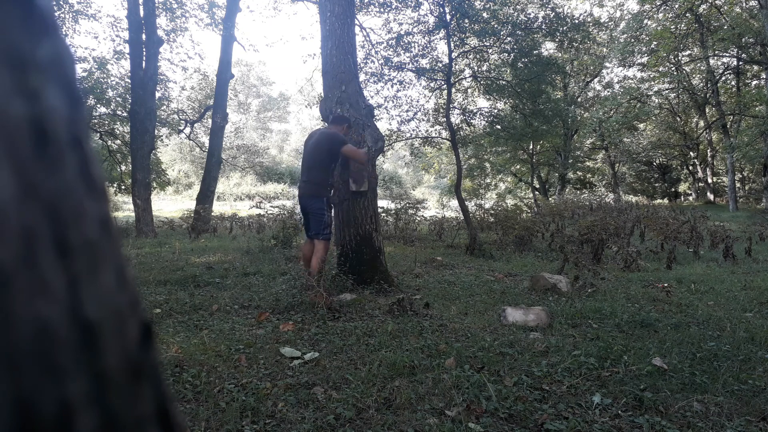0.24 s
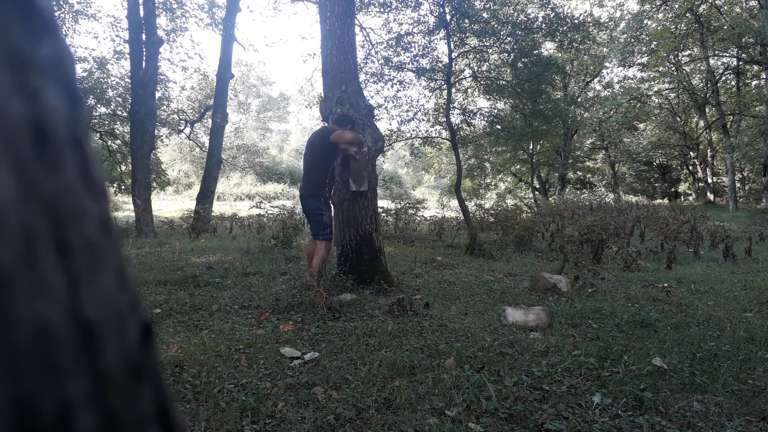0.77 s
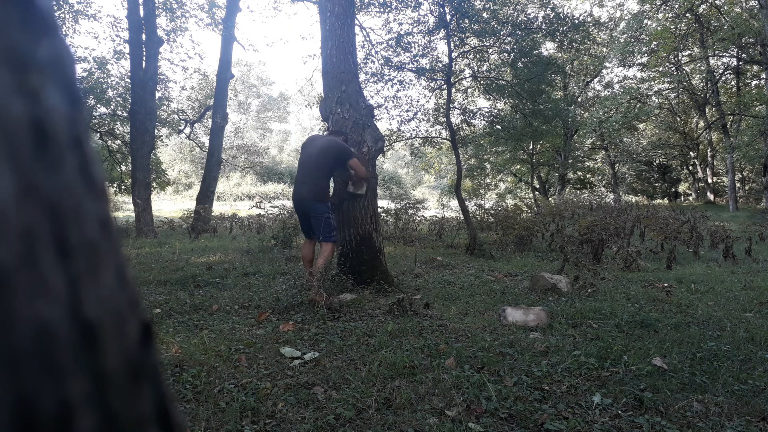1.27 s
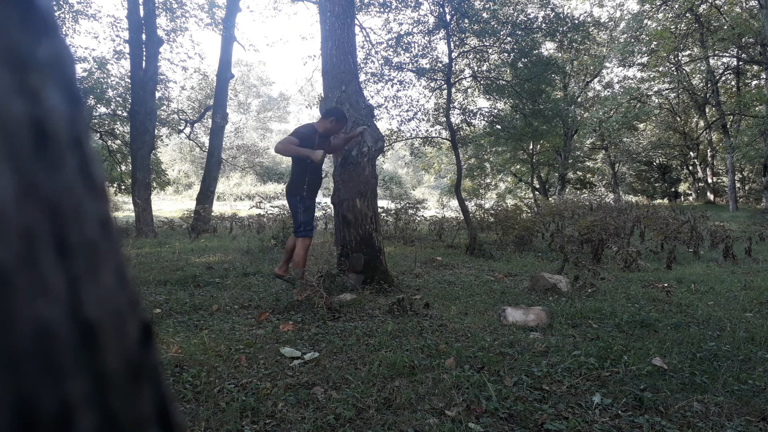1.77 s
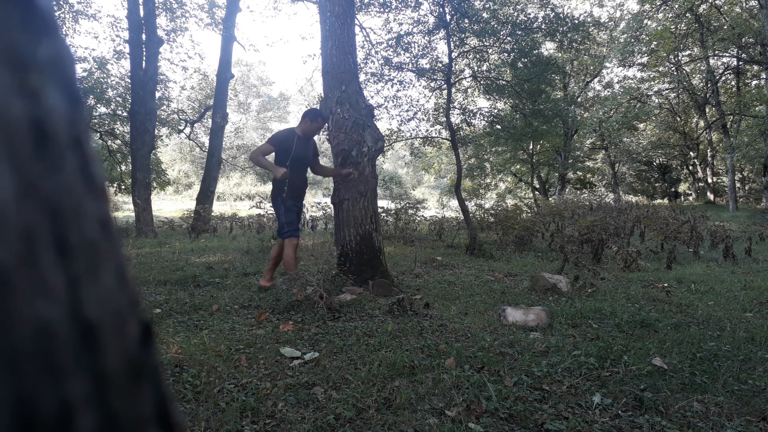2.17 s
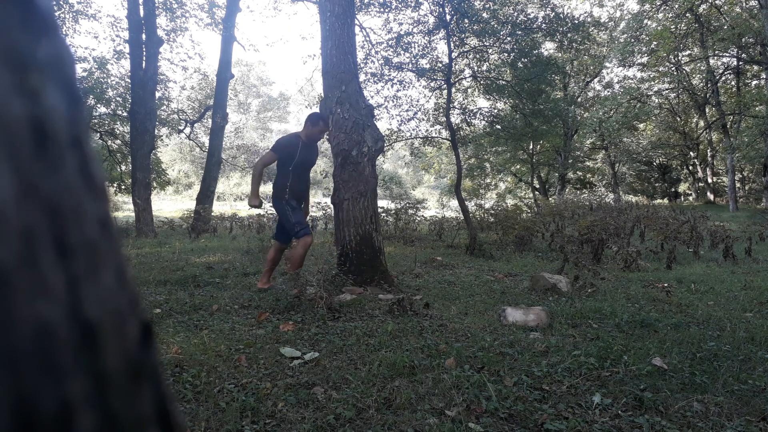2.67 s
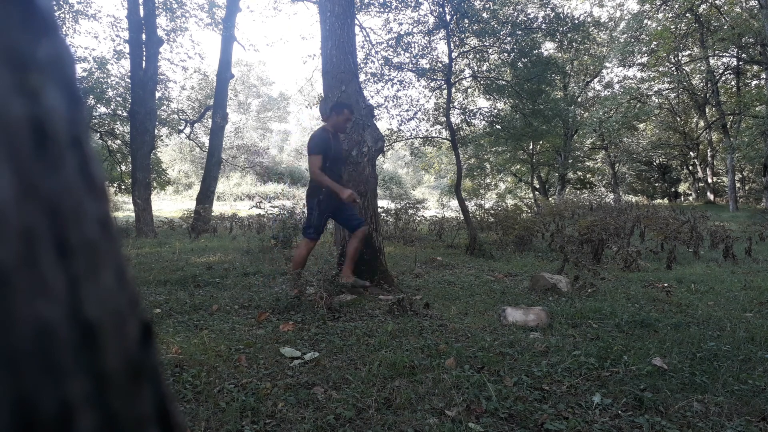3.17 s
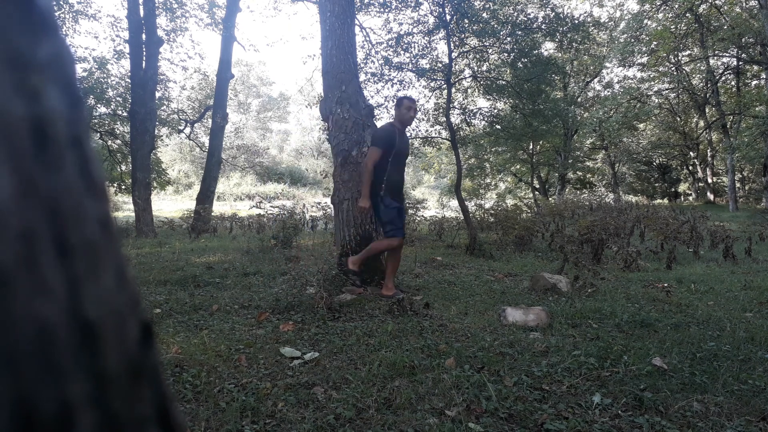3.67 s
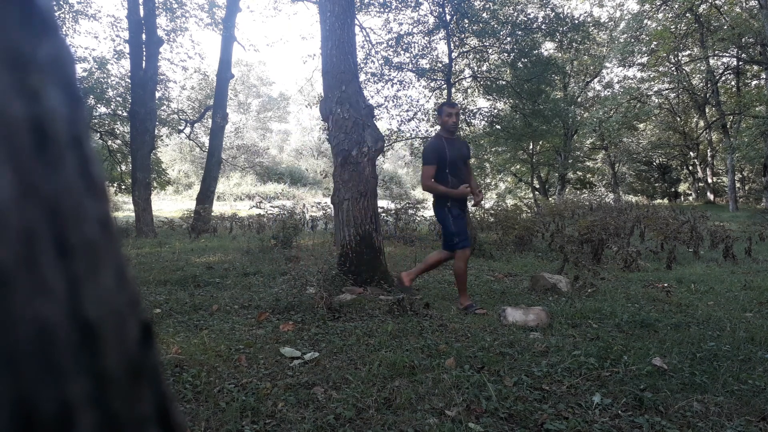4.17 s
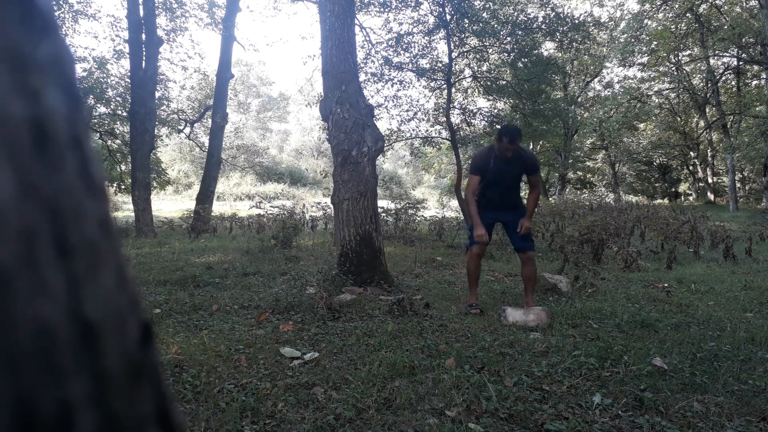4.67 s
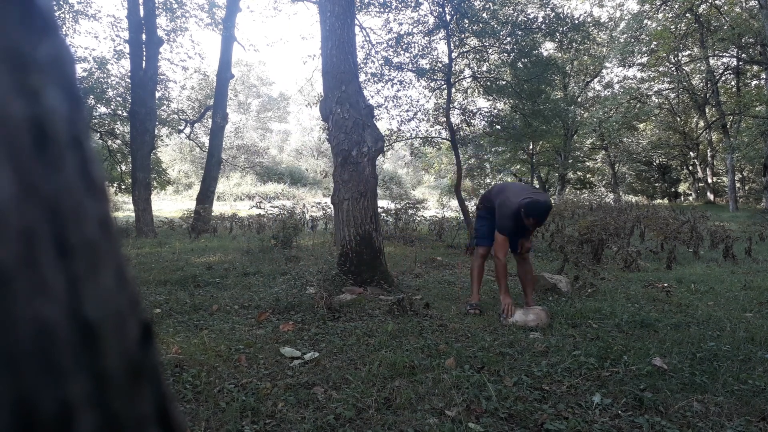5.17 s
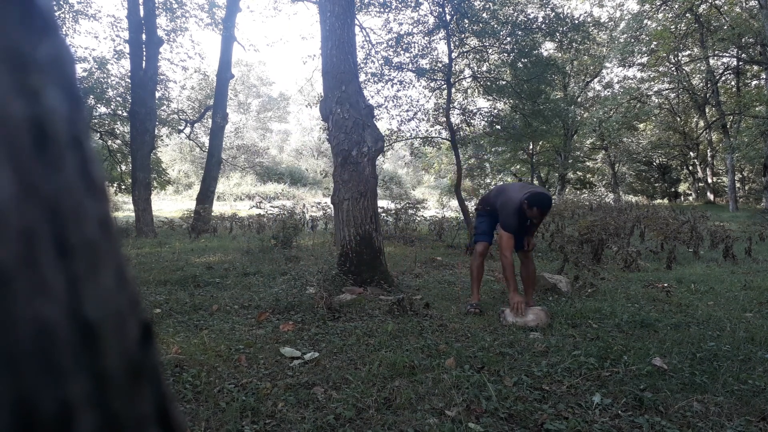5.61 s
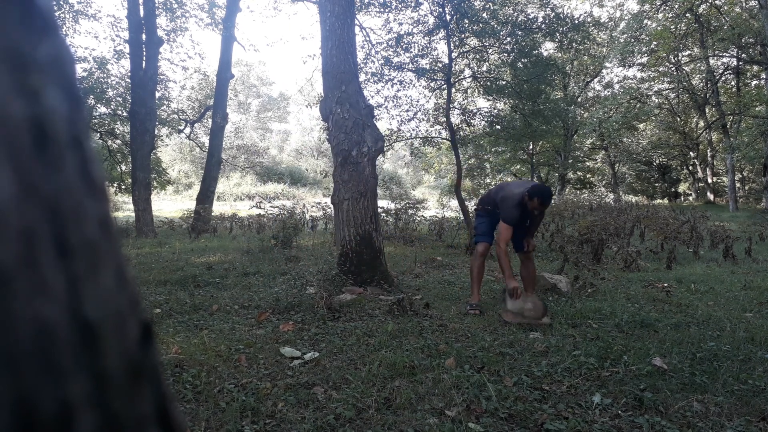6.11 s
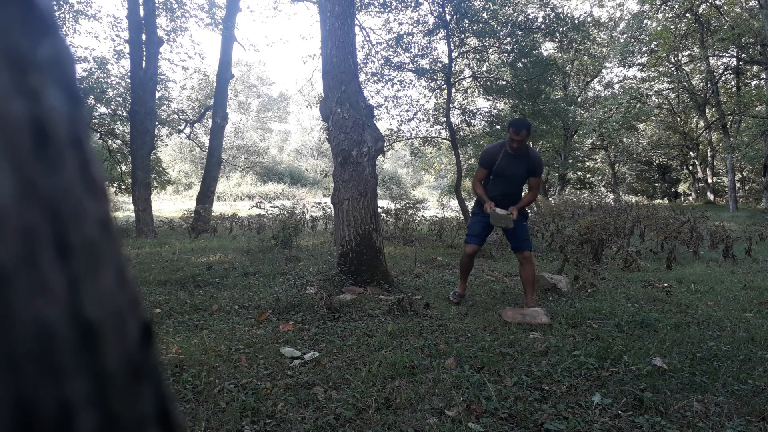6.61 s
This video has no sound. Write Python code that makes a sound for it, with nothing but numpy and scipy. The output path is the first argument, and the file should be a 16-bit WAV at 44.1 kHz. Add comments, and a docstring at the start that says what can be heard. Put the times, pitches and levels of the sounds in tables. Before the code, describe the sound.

In a quiet forest, one blow breaks a wooden board held against a trunk with a loud, sharp crack. The board splinters and its pieces clatter down, ringing briefly. Feet then rustle through dry leaves and snap twigs, wood is knocked lightly, and a crisp twig snap comes near the end. A single microphone beside a trunk picks up short echoes and a faint, steady hush.

```python
"""A forest, one microphone close to a trunk, a steady hush far off. At 1.3 s one blow breaks a wooden board
held against the trunk: its fibres crack in a quick burst that clips the recorder and ducks its gain.
The board splinters, and the pieces clatter down and ring until about 3 s. Then feet rustle the leaf litter
and snap twigs, and wood is knocked lightly; the loudest twig goes just before the end.
All along, the trunks around scatter the sounds of wood into a short tail."""
import sys
import numpy as np
from scipy import signal
from scipy.fft import rfft, irfft, next_fast_len
from scipy.io import wavfile
from scipy.ndimage import uniform_filter1d, map_coordinates

SR = 44100
rng = np.random.default_rng(int(sys.argv[2]) if len(sys.argv) > 2 else 0)


def store_pcm(level_fs):
    """Save levels as 16-bit WAV."""
    pcm = np.round(np.clip(level_fs, -1, 1) * 32767).astype(np.int16)
    wavfile.write(sys.argv[1], SR, np.atleast_2d(pcm).T)


N = 302085

# The board's fibres breaking and its pieces colliding; the first row is the blow:
# start_s, level_db, pitch_hz, body_db, body_hz, treble_db, hold_s, ring_db
CRACKS = [(1.2869, -10.5, 2600, -5.5, 950, -15, 0.0028, -18), (1.2889, 5, 2670, -5.5, 940, -6, 0.0028, -40),
          (1.2979, -1.5, 1455, -11, 930, -18.5, 0.0093, -8.5),
          (1.3069, 0.5, 1540, -13, 890, -25, .003, -44), (1.315, -17.5, 1560, -20, 387, -29, 0.0044, -20),
          (1.3286, -20.5, 1610, -24.5, 405, -34, 0.0028, -24),
          (1.35, -31.5, 1600, -26, 998, -38.5, 0.0035, -18), (1.6083, -34, 1300, -43, 930, -34, .001, -14),
          (1.6217, -29, 2870, -57, 990, -34, 0.00063, -26),
          (1.688, -27, 4100, -55.5, 432, -31.5, 0.00082, -11),
          (1.703, -41, 3200, -45, 296, -28, 0.0036, -3), (1.7237, -37.5, 3560, -57, 990, -31.5, .002, 0),
          (1.7332, -33, 1270, -53, 302, -37, 0.0023, -1), (1.7815, -47, 1410, -58, 670, -41, 0.00085, -16),
          (1.802, -43.5, 3150, -53, 300, -30.5, 0.011, 6),
          (1.831, -23.5, 1120, -27.5, 780, -46.5, 0.0013, -12.5),
          (1.837, -34, 3060, -57, 622, -29, 0.0016, 0.5), (1.876, -37, 4520, -49, 540, -28.5, 0.0035, -10),
          (1.9018, -22, 1150, -35.5, 570, -35, 0.00086, -20),
          (1.918, -25, 2840, -62, 900, -26.5, 0.006, -18),
          (1.9712, -21.5, 3980, -53, 364, -22.5, 0.00048, -20),
          (1.9866, -30, 3170, -34.5, 700, -36, 0.023, 0), (2.034, -51, 4320, -62, 300, -32.5, .001, -16),
          (2.0549, -13.5, 2390, -20, 583, -12, 0.0066, -13.5),
          (2.0634, -12.5, 3900, -16.5, 610, -19.5, 0.0092, -15),
          (2.0994, -20, 1650, -34, 300, -32, 0.0027, -4.5), (2.115, -32, 1630, -58, 880, -48, 0.0034, -9),
          (2.1182, -18.5, 1376, -25.5, 815, -35, 0.0045, -7.5),
          (2.129, -11.5, 1448, -28.5, 830, -33.5, 0.0098, -12),
          (2.1389, -11, 1370, -16, 1100, -48, 0.0068, -8), (2.175, -39, 1370, -41, 433, -38, 0.0018, -14),
          (2.219, -30, 1580, -54, 930, -31.5, .008, -4), (2.247, -36, 1500, -60, 754, -41, 0.0026, -2),
          (2.262, -42.5, 1440, -45, 288, -51, .002, 5), (2.344, -35, 3470, -58, 300, -39, 0.0067, -8),
          (2.3976, -33.5, 4200, -47, 790, -32.5, 0.005, -12),
          (2.5006, -31, 4120, -37.5, 795, -36, 0.0011, -6.5), (2.5453, -51, 1520, -50, 1000, -41, .001, 0),
          (2.712, -47, 1160, -51, 920, -41, .001, -10), (2.7418, -23, 4540, -31.5, 580, -36, 0.0042, -17),
          (2.7474, -22, 1120, -36.5, 584, -48, 0.0043, -12),
          (2.876, -39.5, 1900, -51, 845, -58, 0.0038, -14), (2.82, -37.5, 1980, -47, 1000, -46, 0.0096, -8)]


def amp(db):
    return 10 ** (np.asarray(db) / 20)


def unit_rms(x):
    return x / np.sqrt(np.mean(x ** 2) + 1e-20)


def unit_peak(x):
    return x / np.max(np.abs(x))


def along(points, hz):
    """Interpolate (hz, value) points on a log frequency axis."""
    point_hz, values = np.transpose(points)
    return np.interp(np.log(hz + 1), np.log(point_hz + 1), values)


def curves(rows):
    """One value per sample for each column after the time."""
    time_s, *columns = np.transpose(rows)
    return [np.interp(np.arange(N) / SR, time_s, column) for column in columns]


def wobble(rate_hz):
    """A smooth random curve with rate_hz knots a second."""
    knots = rng.standard_normal(int(N * rate_hz / SR) + 4)
    return map_coordinates(knots, [np.arange(N) * rate_hz / SR])


def filtered(x, response):
    """Filter x by a complex function of frequency."""
    size = next_fast_len(2 * len(x))
    return irfft(rfft(x, size) * response(np.fft.rfftfreq(size, 1 / SR)), size)[:len(x)]


def resonance(f, hz, width_hz):
    """The causal response at f of one resonance centred on hz."""
    return 1j * f * width_hz / (hz * hz - f * f + 1j * f * width_hz)


def add(track, start_s, sound):
    part = track[round(start_s * SR):][:len(sound)]
    part += sound[:len(part)]


def fibre_burst(level_db, pitch_hz, body_db, body_hz, treble_db, hold_s, t60_s, q):
    """Fibres break in uneven clumps that hold, then die: a mid resonance, a low body and treble."""
    clump_db, clump_s, sag_db_per_s, treble_t60_s = 5, 0.0012, 305, 0.041
    t = np.arange(SR // 8) / SR
    dying_s = np.maximum(t - hold_s, 0)
    envelope = amp(-60 * dying_s / t60_s) * (1 - np.exp(-t / 0.00023))
    burst = envelope * rng.standard_normal(len(t))
    clumps = np.interp(t, np.arange(120) * clump_s, rng.standard_normal(120))
    burst *= amp(clump_db * clumps - sag_db_per_s * np.minimum(t, hold_s))
    burst[8] += 4  # the first break is the sharpest
    mid = filtered(burst, lambda f: (resonance(f, pitch_hz, pitch_hz / q) + 0.24)
                   * resonance(f, 2700, 4500) ** 3)
    body = filtered(burst, lambda f: resonance(f, body_hz, 0.7 * body_hz) ** 2)
    brief = burst * amp(-60 * dying_s / treble_t60_s)  # the treble is over first
    treble = filtered(brief, lambda f: resonance(f, 7300, 7000) ** 3 / (1 + 1j * f / 9000) ** 2)
    return (amp(level_db - 3) * unit_peak(mid) + amp(body_db) * unit_peak(body)
            + amp(treble_db + 0.5) * unit_peak(treble))


def breaking_board():
    """Each crack is a burst that also rings the board's modes at new strengths."""
    # Modes of the board: pitch_hz, level_db, t60_s
    modes = [(888, -17.5, 0.043), (1297, -1.5, .055), (1443, 2.5, 0.043), (1549, -1.5, .06),
             (2120, -5.5, 0.12), (2950, -8.5, 0.067), (3110, -5.5, 0.055), (3390, -8, 0.083),
             (4330, -5, 0.052), (4423, -16, .05)]
    out, t = np.zeros(N), np.arange(SR // 4) / SR
    for start_s, level_db, pitch_hz, *body_and_treble, hold_s, ring_db in CRACKS:
        add(out, start_s, fibre_burst(level_db, pitch_hz, *body_and_treble, hold_s, t60_s=0.014, q=6.2))
        attack = 1 - np.exp(-t / (0.0005 + hold_s / 2))
        for mode_hz, mode_db, t60_s in modes:
            near_db = -10 * abs(np.log2(mode_hz / pitch_hz))  # modes near the crack's pitch ring most
            size_db, detune = rng.normal(0, [4, 0.015])
            decay = amp(mode_db + near_db + size_db - 60 * t / t60_s)
            ring = decay * np.sin(2 * np.pi * mode_hz * (1 + detune) * t)
            add(out, start_s, amp(level_db + ring_db) * attack * ring)
    return out


def twigs_and_knocks():
    """Twigs snap underfoot in short bursts; lightly knocked wood dies more slowly."""
    # Snaps and knocks, both: start_s, level_db, pitch_hz, body_db, body_hz, treble_db, hold_s
    twigs = [(3.365, -49, 3800, -58, 600, -49, 0.0027), (3.3713, -43, 3800, -53, 610, -45, 0.0009),
             (3.3974, -27.5, 4330, -49, 775, -40, 0.0052), (3.406, -26.5, 4300, -41, 800, -39, 0.007),
             (3.981, -55, 1510, -62, 400, -41, 0.0055), (4.065, -59, 3000, -62, 500, -50, 0.0059),
             (4.1564, -46.5, 2150, -62, 780, -49, .001), (4.2046, -43, 1004, -44.5, 517, -58, .001),
             (4.3055, -44, 1000, -44, 965, -50, 0.0023), (5.081, -53, 3000, -63.5, 500, -46.5, 0.00096),
             (5.666, -42, 1212, -58, 518, -55, 0.0012), (6.783, -38.5, 3840, -58, 296, -32, .001),
             (6.824, -20.5, 3870, -37, 490, -20.5, 0.0012)]
    knocks = [(3.943, -33.5, 1264, -31, 413, -41, .004), (4.0243, -28.5, 1010, -30, 356, -42.5, 0.0039),
              (5.404, -37.5, 1190, -39.5, 349, -55, .002), (5.422, -52.5, 1167, -41, 800, -58, .002),
              (5.944, -44, 1000, -46.5, 390, -56.5, .002), (6.0613, -49, 2300, -45.5, 365, -57, .001)]
    out = np.zeros(N)
    for start_s, *burst in twigs:
        add(out, start_s, fibre_burst(*burst, t60_s=0.0081, q=7.8))
    for start_s, *burst in knocks:
        add(out, start_s, fibre_burst(*burst, t60_s=0.029, q=5.5))
    return out


def wood_rubs():
    """Rough wood rubs: noise in one narrow resonance, swelling and fading."""
    # Short rubs: start_s, length_s, pitch_hz, level_db
    rubs = [(1.988, 0.036, 3130, -40), (4.245, 0.033, 1960, -55), (2.85, 0.099, 1970, -62),
            (3.205, 0.098, 2660, -60), (5.31, .04, 2906, -63.5), (5.398, 0.044, 1124, -49.5)]
    out = np.zeros(N)
    for start_s, length_s, pitch_hz, level_db in rubs:
        noise = rng.standard_normal(SR // 8)
        grit = unit_rms(filtered(noise, lambda f: resonance(f, pitch_hz, 0.09 * pitch_hz) ** 2))
        swell = np.hanning(round(length_s * SR)) ** 0.5
        add(out, start_s, amp(level_db) * grit[:len(swell)] * swell)
    return out


def thuds():
    """Soft landings on the soil, and a short one-sided low thump at the clipped peak."""
    # Pieces and feet landing: start_s, level_db, pitch_hz
    landings = [(1.324, -36, 204), (2.058, -52, 162), (2.129, -40, 188), (2.258, -50, 154),
                (2.319, -49, 199), (4.023, -53, 258)]
    # Low thump at the clipped peak: start_s, peak_db, length_s
    clip_thump = [(1.29, -31, 0.0055)]
    out, t = np.zeros(N), np.arange(SR // 5) / SR
    envelope = amp(4 - 60 * t / 0.09) * (1 - np.exp(-t / 0.0021))
    for start_s, level_db, pitch_hz in landings:
        add(out, start_s, amp(level_db) * envelope * np.sin(2 * np.pi * pitch_hz * t))
    for start_s, peak_db, length_s in clip_thump:
        add(out, start_s, -amp(peak_db) * np.hanning(round(length_s * SR)))
    return out


def leaf_litter():
    """Dry leaves: tiny uneven clicks in clumps over a soft swish; wood and bark shuffle lower down."""
    # Litter and splinters falling after the blow, then a faint rustle: time_s, crisp_db, dull_db
    debris = [(1.3, -58.5, -30), (1.67, -62.5, -59.5), (1.83, -53, -68), (2.04, -50, -65),
              (2.14, -48.5, -43), (2.21, -54, -48.5), (2.45, -51, -56), (2.65, -59.5, -65.5),
              (2.95, -70.5, -64), (3.8, -77.5, -72.5), (4.2, -69.5, -60), (5.6, -79, -70),
              (6.85, -72, -65.5)]
    # Feet and hands in the leaves (footfalls start at once, shuffles swell):
    # full_at_s, swell_s, hold_s, level_db
    stirs = [(2.745, .005, .04, -70), (3.254, 0.048, 0.03, -71.5), (3.359, 0.004, 0.037, -55.5),
             (3.95, .005, .12, -65.5), (4.147, .03, 0.045, -67.5), (4.415, .08, 0.053, -68),
             (4.592, 0.033, 0.044, -61.5), (4.687, .02, 0.13, -68), (4.92, 0.064, 0.14, -77),
             (5.24, .03, .03, -75.5), (5.349, .08, .06, -70), (5.826, .03, 0.044, -69),
             (5.97, .05, .14, -69), (6.482, 0.081, .11, -64.5), (6.738, 0.074, .03, -60),
             (6.825, .005, 0.044, -61)]
    # Spectrum of dry leaves: frequency_hz, level_db
    leaf_spectrum = [(2060, -62), (3500, -7.5), (4340, -4), (6530, 3.5), (7230, 3), (8470, 2.5), (9380, -5),
                     (14400, -5), (16000, -16)]
    swell_db, fall_db_per_s, clicks_per_s, tick_db = 17.5, 258, 600, -7
    crisp_db, dull_db = curves(debris)
    t, crisp_gain = np.arange(N) / SR, amp(crisp_db)
    for full_at_s, swell_s, hold_s, level_db in stirs:
        before_db = swell_db * np.maximum(full_at_s - t, 0) / swell_s
        after_db = fall_db_per_s * np.maximum(t - full_at_s - hold_s, 0)
        crisp_gain += amp(level_db - before_db - after_db)
    sizes = amp(np.minimum(4 * rng.exponential(1, N), 14))
    clicks = sizes * (rng.random(N) < clicks_per_s / SR) * rng.standard_normal(N)
    clumps = amp(1.482 * wobble(130) + 1.5 * wobble(35))
    rustle = clumps * (0.2 * unit_rms(clicks) + rng.standard_normal(N))
    crisp = patchy(filtered(rustle, lambda f: amp(along(leaf_spectrum, f))), depth_db=3)
    dull = unit_rms(filtered(rustle, lambda f: resonance(f, 2400, 2600) ** 2))
    after_blow = t > CRACKS[0][0]  # the leaves lie still until then
    return after_blow * (crisp_gain * (crisp + amp(tick_db) * leaf_ticks()) + amp(dull_db) * dull)


def leaf_ticks(per_s=50, t60_s=0.0043):
    """Single leaves crack: sparse brief ticks, each in its own high band."""
    t, out = np.arange(SR // 200) / SR, np.zeros(N)
    for when, weakness, height in rng.random((round(per_s * N / SR), 3)):
        pitch_hz = 4500 * 2.8 ** height
        envelope = amp(-5 * np.log(weakness + 0.1) - 60 * t / t60_s)
        rough_tone = np.sin(2 * np.pi * pitch_hz * t + rng.normal(0, 0.83, len(t)))
        add(out, when * N / SR, envelope * rough_tone)
    return unit_rms(out)


def patchy(x, depth_db):
    """Make a sound flicker with random gain in patches of time and frequency."""
    spectra = signal.stft(x, nperseg=256)[2]
    patches = uniform_filter1d(rng.standard_normal(spectra.shape), size=12, axis=0)
    patches = unit_rms(uniform_filter1d(patches, size=8, axis=1))
    return unit_rms(signal.istft(spectra * amp(depth_db * patches), nperseg=256)[1][:N])


def trunk_echoes(x, delay_s=0.012):
    """Trunks scatter the sound back after a few metres; each frequency dies at its own speed."""
    # The scattered tail: frequency_hz, t60_s, level_db
    scatter = [(200, .2, -16), (600, .3, -4.5), (1000, 0.65, -12.5), (1291, 1, 0), (1540, 0.7, -0.5),
               (1960, 0.51, -2), (3000, 0.32, -1.5), (4470, 0.6, 1), (7600, 0.47, 0), (10000, .3, -7.5),
               (15000, 0.25, -13.5)]
    hz, t, spectra = signal.stft(rng.standard_normal(SR), SR, nperseg=256)
    band_hz, t60_s, level_db = np.transpose(scatter)
    colour_db = along(np.c_[band_hz, level_db], hz)[:, None]
    decay_db = 60 * t / along(np.c_[band_hz, t60_s], hz)[:, None]
    tail = signal.istft(spectra * amp(colour_db - decay_db), SR, nperseg=256)[1]
    delayed = np.pad(x, (round(delay_s * SR), 0))
    return signal.fftconvolve(delayed, tail / np.linalg.norm(tail))[:N]


def forest_hush():
    """The far, steady hush of the wood and a wavering low rumble."""
    # Spectra of the hush and the rumble: frequency_hz, level_db
    hush_spectrum = [(120, -15.5), (200, -11.5), (322, -14), (401, -12.5), (482, -10.5), (635, -12),
                     (722, -11), (791, -11), (1500, -10.5), (5040, -24), (6280, -22), (9400, -36),
                     (16000, -33.5)]
    rumble_spectrum = [(18, -56), (30, -17), (70, -2.5), (251, -4.5), (286, -8.5), (400, -9.5),
                       (520, -36.5), (880, -120)]
    # Slow drift of the background: time_s, rumble_db, hush_db
    drift = [(0, -64.5, -59.5), (1.28, -65.5, -59), (1.75, -71, -58.5), (2.2, -62, -54.5), (2.6, -67, -59),
             (4.1, -67, -59.5), (5.5, -71, -59.5), (6.85, -68.5, -59.5)]
    rumble_db, hush_db = curves(drift)

    def noise(spectrum, low_cut_hz=70):
        response = lambda f: amp(along(spectrum, f)) * f ** 2 / (f ** 2 + low_cut_hz ** 2)
        return unit_rms(filtered(rng.standard_normal(N), response))

    hush = amp(hush_db + 0.43 * wobble(16)) * noise(hush_spectrum)
    rumble = amp(rumble_db + 1.3 * wobble(4.4)) * noise(rumble_spectrum)
    return hush + rumble


def scene():
    """At the microphone, in mono: near wood and its echoes, soil and leaves, the forest beyond."""
    wood = breaking_board() + twigs_and_knocks() + wood_rubs()
    treble_dip = lambda f: 1 - 0.76 * resonance(f, 10000, 3500)  # the near wood sounds dip near 10 kHz
    bass_cut = lambda f: (f / (f - 150j)) ** 2  # deep bass is cut from the wood sounds
    wood = filtered(wood, lambda f: treble_dip(f) * bass_cut(f))
    return (wood + amp(-16.5) * trunk_echoes(wood) + thuds() + leaf_litter() + forest_hush())[None]


def record(dry):
    """The recorder: a loud peak ducks the gain, which creeps back; the loudest clips; the top is cut."""
    threshold_db, duck_share, duck_s, recover_db_per_s, top_hz = -7, 0.65, 0.05, 9, 15900
    level_db = 20 * np.log10(np.abs(dry[0]) + 1e-9)
    wanted_db = duck_share * np.clip(level_db - threshold_db, 0, -threshold_db)
    recovery_db = recover_db_per_s * np.arange(N) / SR
    held_db = np.maximum.accumulate(wanted_db + recovery_db) - recovery_db
    step = 1 / (duck_s * SR)
    ducked = dry[0] * amp(-signal.lfilter([step], [1, step - 1], held_db))
    clipped = ducked / (1 + np.abs(ducked) ** 8) ** (1 / 8)
    return filtered(clipped, lambda f: f < top_hz)[None]


dry = scene()
out = record(dry)
store_pcm(out)
```